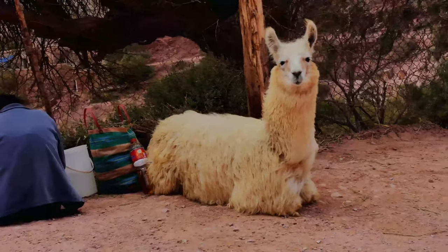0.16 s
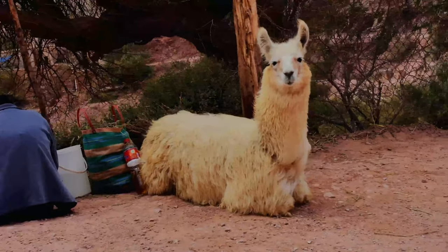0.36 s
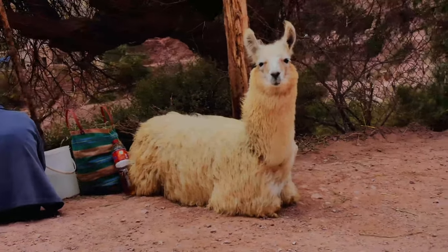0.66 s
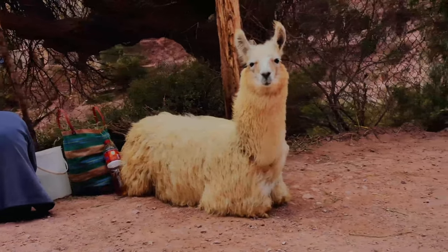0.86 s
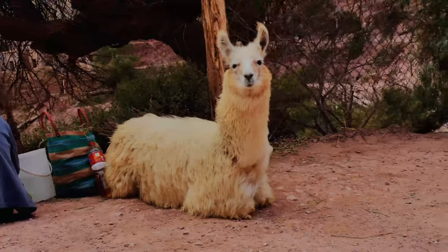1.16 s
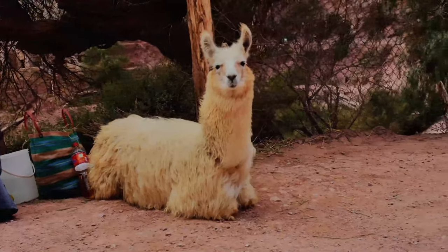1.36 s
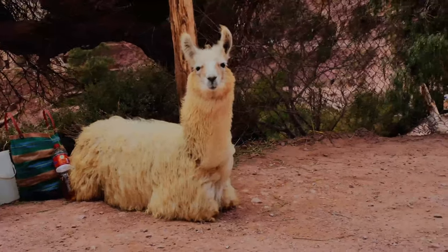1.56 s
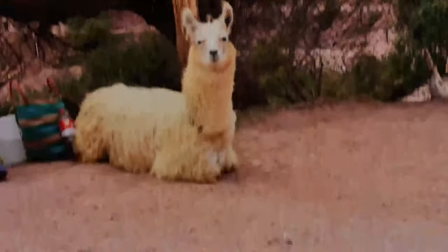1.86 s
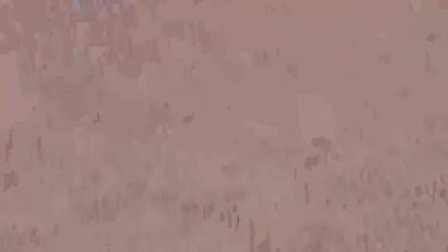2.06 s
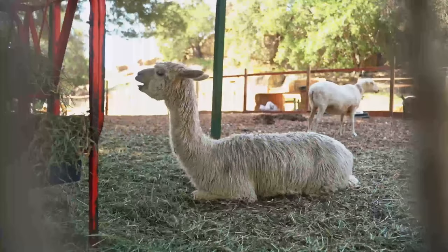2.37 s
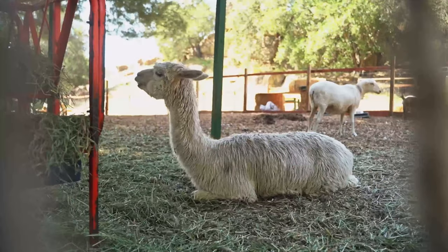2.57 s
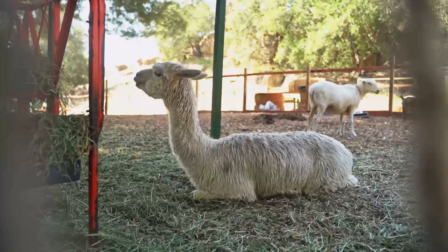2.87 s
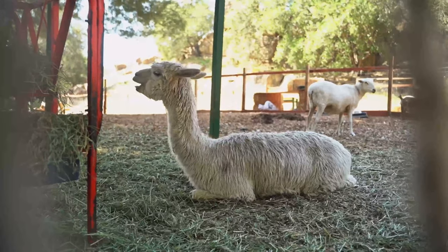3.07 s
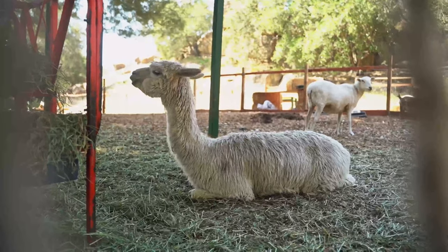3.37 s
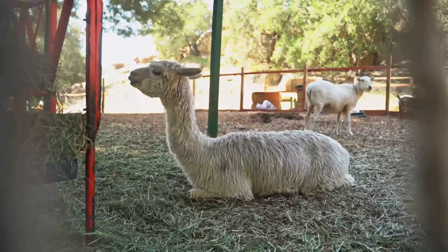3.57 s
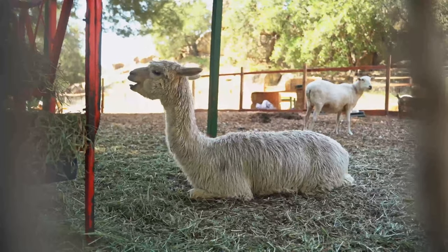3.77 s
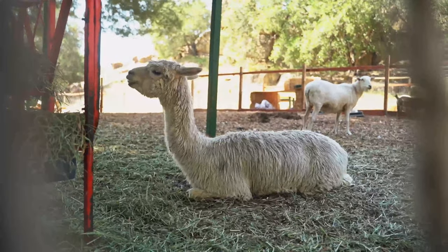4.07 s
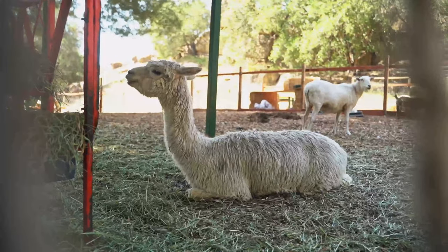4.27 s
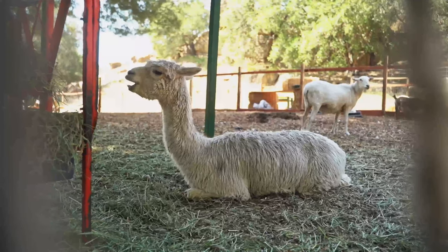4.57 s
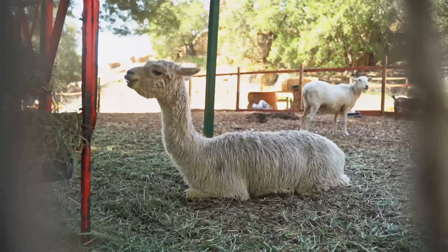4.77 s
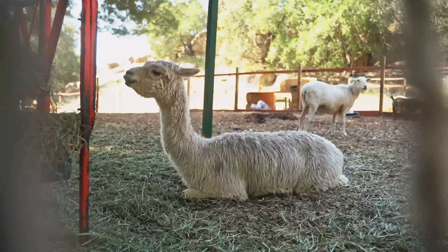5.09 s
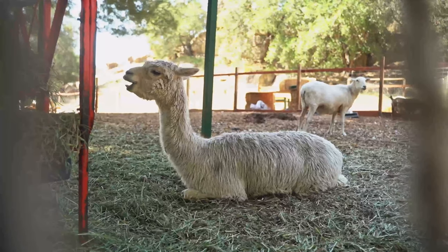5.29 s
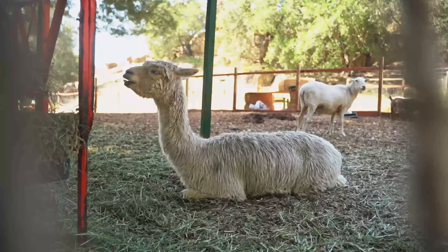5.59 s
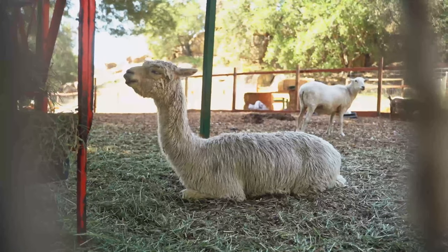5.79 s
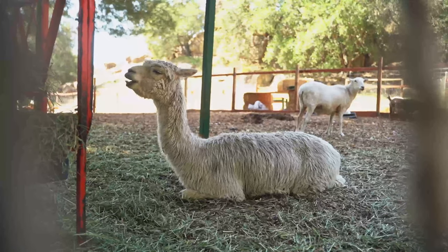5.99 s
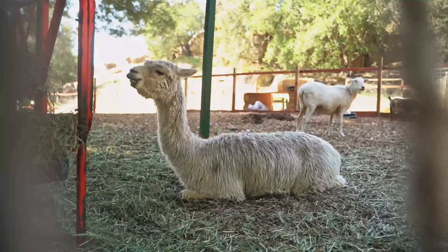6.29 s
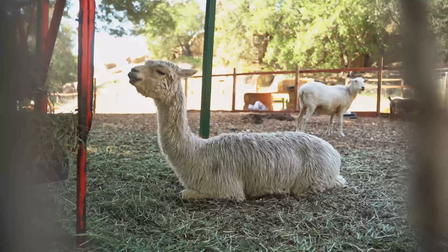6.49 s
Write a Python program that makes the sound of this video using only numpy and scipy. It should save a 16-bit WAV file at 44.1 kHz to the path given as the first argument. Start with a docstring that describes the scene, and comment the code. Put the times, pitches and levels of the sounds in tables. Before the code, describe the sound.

A llama rasps harshly over a low sputtering crackle, then after a cut another groans creakily and later screeches into clucks amid birdsong.

```python
"""A llama rasps harshly: throat resonances ring on noise, kicked and choked by wet flaps of tissue.
Under it sputters a low crackle of clumped noise and pops that swells and stops dead at a cut to a quiet pen.
There a llama gives a creaky groan (slack pulses, thin sine whine), then a throbbing screech (squeal, whistle
and buzz) that breaks into short clucks. Gliding sine notes of small birds run through both scenes, over
soft outdoor noise; the pen also has a low rumble."""
import sys
import numpy as np
from scipy import signal
from scipy.fft import rfft, irfft, next_fast_len
from scipy.io import wavfile
from scipy.ndimage import uniform_filter1d

SR = 44100
rng = np.random.default_rng(int(sys.argv[2]) if len(sys.argv) > 2 else 0)


def unload_audio(sound):
    """Save the sound as a 16-bit wav file, at the path given as the first command line argument."""
    columns = np.transpose(np.atleast_2d(sound))
    # keep every value between -1 and 1, then stretch to whole-number steps
    steps = np.round(np.clip(columns, -1, 1) * 32767)
    wavfile.write(sys.argv[1], SR, steps.astype(np.int16))


N = 292912
T = np.arange(N) / SR  # s

CUT_S = 2.068  # hillside before, pen after
EDGE_HZ = 15750  # top of the whole sound

# Llama calls. Each is one row: start in seconds, end in seconds, starting level in dB before the voice's trim,
# swell in dB per second, attack in seconds, release in seconds. Attack and release each span FADE_DB.
RASP_CALL = (.484, 1.212, -26.3, 6.5, .003, .02)
SCREECH_CALL = (6.013, 6.255, -21, 17, 0.02, 0.02)
GROAN_CALL = (2.33, 3.105, -38.5, 6.5, .27, .17)
FADE_DB = 15.5

# Wet flaps of soft tissue in the rasp. Each entry: time in seconds.
FLAP_TIMES = [.528, .545, .559, .573, .588, 0.604, 0.62, .645, .673, .71, 0.737, .786, 0.843, .87, .915,
              .93, 1.065, 1.134]
# Brief dips in the level of the rasp. Each entry: time in seconds.
CATCH_TIMES = [.537, .662, 1.054]
CATCH_HALF_S, CATCH_DB = 0.0053, -13.5

# Throat resonances at rest. Each row: frequency in Hz, width in Hz, relative level in dB.
RASP_THROAT = [(1429, 55, 6.5), (1840, 350, -3.5), (2714, 235, 2), (3140, 340, -5)]
STRAINED_THROAT = [(480, 55, -10), (1609, 70, -2), (2044, 100, -8.5), (2907, 84, -5.5), (3345, 200, -4),
                   (4593, 120, -1)]
GROAN_THROAT = [(546, 60, -1.5), (1524, 160, -7), (1860, 250, -8), (2290, 160, -6), (2730, 900, -14.5)]

# Spectra of air rushing through the throat. Each row: frequency in Hz, relative level in dB.
RASP_AIR = [(900, -30), (1400, 8), (4300, 3), (5600, -10), (8000, -10.5), (9500, -41)]
SCREECH_AIR = [(800, -10), (1150, -12.5), (3300, -3), (6950, -1), (7600, -40), (9300, -14), (11000, -59)]

# Partials of the squeal from the fundamental up. Each entry: relative level in dB at full push.
SQUEAL_PARTIALS = [-7.5, 4.2, -7]
# the squeal's pitch arches once above rest (lift as a fraction)
SQUEAL_HZ, ARCH_LIFT, ARCH_TOP_S, ARCH_HALF_S = 1527, .093, 6.124, .043
# one hard push in the screech, which ebbs away
PUSH_S, PUSH_DB, PUSH_RISE_S, PUSH_EBB_S = 6.083, 5.5, 0.0043, 0.093
# second whistle of the screech, at rest and at full push
WHISTLE_HZ, WHISTLE_DB = 4950, -1.5

# Clucks. Each row: time in seconds, level in dB, half length in seconds, jaw opening as a pitch factor.
CLUCKS = [(6.27, -21.5, 0.0067, 0.96), (6.312, -30, 0.015, 1.03), (6.415, -28, 0.0087, 0.96),
          (6.454, -30, 0.013, 1.02), (6.509, -26.5, 0.012, .98), (6.623, -24.5, 0.013, 0.9)]

# Loudest single pops of the crackle. Each row: time in seconds, peak in dB before the pop trim.
POPS = [(0.101, -18), (.155, -18.5), (.202, -23), (0.294, -10.5), (0.387, -14), (0.545, -9), (0.649, -7.5),
        (0.711, -6.5), (0.97, -9), (1.009, -4.5), (1.025, -9), (1.26, -10), (1.303, -12), (1.328, -7.5),
        (1.362, -10), (1.371, -9), (1.457, -4), (1.918, -5)]
# Spectrum of the crackle. Each row: frequency in Hz, relative level in dB.
POP_COLOUR = [(40, -37), (140, -6), (280, 1.5), (650, -3.5), (1600, -15), (4500, -35.5), (10500, -49.5),
              (15000, -64)]
# Surges of the crackle. Each row: start in seconds, length in seconds, level in dB.
SURGES = [(0.668, 0.059, -24), (0.828, 0.042, -21.5), (1.217, 0.044, -23), (1.3, 0.038, -22.5),
          (1.435, 0.031, -18), (1.426, 0.14, -20.5), (1.511, .022, -12.5), (1.592, 0.049, -17),
          (1.75, 0.31, -18.5), (1.842, 0.023, -14.5)]
SURGE_RISE_DB_PER_S, SURGE_FALL_DB_PER_S, SIMMER_DB = 1400, 1000, -33.5
# Duller filter on the late crackle. Each row: frequency in Hz, gain in dB.
DULL = [(650, 1.5), (1300, -6)]
DULL_FROM_S = 1.7

# Bird syllables by name. Each row: length in seconds, swell in dB from start to end,
# pitch path in Hz at even steps, before the note's pitch factor.
SYLLABLES = { "tew": (0.0865, 0, [5650, 5350, 5320]), "slur": (.075, -5, [5250, 4950, 4150]),
             "seep": (.17, -20, [7150, 7840, 8050]), "arch": (0.14, 0, [6750, 7300, 7230, 6990, 6400]),
             "dip": (0.06, -5, [7000, 6330, 7100]), "rise": (0.0546, 4.7, [5500, 6110, 6300, 6300]),
             "whistle": (.3, 10.5, [4890, 3720, 3518, 3508, 3448]), "held": (0.23, 0, [3400]),
             "lilt": (0.22, -7, [2500, 2680, 2820]), "warble": (0.06, 0, [3615, 4320, 4040, 3220]),
             "drop": (.034, 0, [4200, 3700, 2950]), "flick": (.042, 3, [4200, 4600, 6050]),
             "zip": (0.041, -8, [5900, 4300, 3800])}
# Single bird notes by syllable. Each row: start in seconds, level in dB before the birds' trim,
# pitch factor if not 1.
NOTES = { "tew": [(.248, -42.5), (2.25, -38.5, 0.94), (2.912, -44.5, 0.96), (4.962, -37.5), (5.418, -37.5),
         (.235, -39, .47), (3.575, -43, .54)], "slur": [(3.285, -37.5), (3.95, -43.5)], "seep": [(.04, -53),
         (2.075, -50.5, 0.94), (4.75, -55.5), (5.21, -58.5)], "dip": [(5.882, -46), (6.343, -49),
         (1.825, -39, 0.578), (1.94, -38, .58)], "rise": [(1.575, -46), (2.449, -40.5)],
         "held": [(2.03, -48, 0.66), (2.8, -38, 1.08), (4.95, -40), (5.14, -45)], "lilt": [(3.932, -44.5)],
         "warble": [(0.037, -44, 1.06), (.152, -43), (2.303, -41.5, .66), (.445, -39, 0.68), (3.84, -38),
         (4.1, -49.5, 1.804)], "drop": [(.21, -40), (4.3, -46, .78), (4.78, -47, .78)]}
# Runs of one syllable. Each row: syllable, start in seconds, end in seconds, period in seconds,
# typical level in dB before the birds' trim, pitch factor.
RUNS = [("flick", .09, .45, .1, -47.5, 0.99), ("dip", 1.168, 2, .156, -53, 1),
        ("arch", 2.565, 3.7, .213, -50.5, 0.99), ("drop", 2.955, 3.9, .0708, -44, .87),
        ("whistle", 3.11, 3.6, .395, -40, 1.02), ("whistle", 3.905, 4.8, .38, -37, 1),
        ("flick", 4.102, 4.7, .0922, -40.5, 0.97), ("flick", 4.747, 7.1, .0935, -46.5, .93),
        ("zip", 5.077, 6.02, .0651, -44, 1)]
# Chatter. Each row: start in seconds, end in seconds, top level in dB before the birds' trim,
# base pitch factor, note count.
CHATTER = [(3.78, 4.62, -42.5, 1.06, 19)]

# Outdoor background spectra. Each row: frequency in Hz, relative level in dB.
HILL_AIR = [(30, 1.5), (110, 6), (1200, -23.5), (3000, -5.5), (8500, -31.5), (15000, -42.5)]
PEN_AIR = [(50, 5), (350, 0), (1900, -14), (3800, -3), (7000, -24.5), (15000, -35)]
HILL_DB, PEN_DB = -41.5, -46
# Low rumble in the pen. Each row: time in seconds, level in dB.
RUMBLE = [(3.1, -48), (5.9, -54), (6.1, -38)]

# Width between the ears. Each row: frequency in Hz, side level against the middle in dB.
SPUTTER_WIDTH = [(280, -13), (700, -5.5), (2400, -6)]
AIR_WIDTH = [(60, -20.5), (380, -11.5), (1300, 1.5)]


def rasp(level_db=-.5, air_db=-14.5, rattle_hz=95, rattle_db=2.3, bend=0.357, flap_s=0.00338,
         snap_db=4, shut_db=-10, shut_s=0.0061, uneven_db=1.5, brighten_db=6.5):
    """Each flap kicks level and resonances up, then chokes the throat; the upper resonances grow late on."""
    kick = sum(bump(s, flap_s) for s in FLAP_TIMES)
    shut = sum(bump(s + shut_s, flap_s) for s in FLAP_TIMES)
    bent = sum(bump(s + flap_s, flap_s) for s in FLAP_TIMES)
    # a quicker, uneven rattle shakes both pitch and level
    rattle = wander(rattle_hz)
    jaw = 1 + bend * bent + 0.035 * rattle
    envelope = effort(RASP_CALL)
    drive = noise() * (envelope > 0)
    low = steady(throat(drive, RASP_THROAT[:2], jaw), size=400)
    high = steady(throat(drive, RASP_THROAT[2:], jaw), size=400)
    brighter = np.clip((T - .9) / 0.18, 0, 1)
    voice = steady(low + high * amp(-4 + brighten_db * brighter))
    # hardly any voice passes below the lowest resonance
    voice = signal.sosfilt(signal.butter(6, 1280, "highpass", fs=SR, output="sos"), voice)
    breath = amp(air_db) * steady(colour(drive, RASP_AIR))
    caught = sum(bump(s, CATCH_HALF_S) for s in CATCH_TIMES)
    gain_db = level_db + uneven_db * wander(34) + rattle_db * rattle
    gain_db = gain_db + snap_db * kick + shut_db * shut + CATCH_DB * caught
    return amp(gain_db) * envelope * (voice + breath)


def screech(level_db=-4, throat_db=-3.5, air_db=-6.5, fold_hz=465, fold_depth=0.33, jitter=0.00683,
            throb_hz=78, throb_depth=0.52, throb_s=6.1095, soften_db=3, beat_db=-8):
    """A squeal modulated by a slower fold, with a whistle and strained buzz; it throbs just after the push."""
    rise = np.clip(1 + (T - PUSH_S) / PUSH_RISE_S, 0, 1)
    push = rise * np.exp(-(np.maximum(T - PUSH_S, 0) / PUSH_EBB_S) ** 2)
    gain = effort(SCREECH_CALL) * amp(PUSH_DB * push)
    pitch = SQUEAL_HZ * (1 + ARCH_LIFT * bump(ARCH_TOP_S, ARCH_HALF_S))
    below_top = pitch / pitch.max()
    high = glide(pitch * (1 + jitter * wander(254)))
    # the slow fold reaches fold_hz at the top of the arch
    low = glide(fold_hz * (1 + 0.0254 * wander(194)) * below_top)
    # higher partials soften as the push ebbs
    partials = sum(amp(db + k * soften_db * (push - 1)) * np.cos((k + 1) * high)
                   for k, db in enumerate(SQUEAL_PARTIALS))
    fold = np.cos(low) + np.cos(2 * low) / 2
    squeal = unit(amp(beat_db) * np.cos(high + low) + partials * (1 + fold_depth * fold))
    jaw = np.sqrt(pitch / pitch.mean())
    strain = steady(throat(noise() * (gain > 0), STRAINED_THROAT, jaw), size=400)
    # the whistle dips while the squeal arches
    whistle_hz = WHISTLE_HZ * (SQUEAL_HZ / pitch) ** .72
    whistle = np.sin(glide(whistle_hz * (1 + jitter * wander(210))))
    tones = squeal + amp(WHISTLE_DB) * whistle * (1 + push) / 2
    rush = unit(colour(buzz(below_top), SCREECH_AIR))
    throb = 1 + throb_depth * bump(throb_s, 0.021) * np.cos(2 * np.pi * throb_hz * (T - throb_s))
    return amp(level_db) * gain * throb * (tones + amp(throat_db) * strain + amp(air_db) * rush)


def clucks(air_db=-5):
    """Short pushes of strained buzz and breath through the same throat, each with its own jaw setting."""
    gain = sum(amp(db) * bump(s, half) for s, db, half, _ in CLUCKS)
    nearest = np.argmin([abs(T - row[0]) for row in CLUCKS], axis=0)
    jaw = uniform_filter1d(np.array(CLUCKS)[nearest, 3], size=600)
    drive = buzz(jaw)
    calling = T > SCREECH_CALL[1]
    voice = steady(throat((drive + noise()) * calling, STRAINED_THROAT, jaw), size=400)
    return gain * calling * (voice + amp(air_db) * unit(colour(drive, SCREECH_AIR)))


def buzz(jaw, fold_hz=424, breath_db=-5, jitter=.011):
    """Wavering pulses of the strained folds, with some air; the jaw factor scales their rate."""
    turns = np.cumsum(fold_hz * jaw * (1 + jitter * wander(120))) // SR
    pulses = np.diff(turns, prepend=0)
    return unit(unit(pulses - pulses.mean()) + amp(breath_db) * noise())


def groan(level_db=-1.5, creak_hz=125, breath=0.041, rise_per_s=0.3, open_s=2.747,
          brighten_db_per_s=10, whine_hz=3930, warble=0.0484):
    """Slow, uneven pulses of a slack voice that brightens as the mouth opens, under a thin rising whine."""
    phase = cycles(creak_hz, jitter=.35)
    pulses = (np.diff(phase, prepend=0) < 0) * amp(3.6 * wander(80))
    envelope = effort(GROAN_CALL)
    drive = (pulses + breath * noise() * np.exp(-phase)) * (envelope > 0)
    low = throat(drive, GROAN_THROAT[:1], np.ones(N), drift=.035)
    high = throat(drive, GROAN_THROAT[1:], np.ones(N), drift=.035)
    since = np.clip(T - open_s, -.4, .2)
    flutter = np.cos(2 * np.pi * cycles(125, jitter=.25))
    whine_path = whine_hz * (1 + rise_per_s * since) * (1 + warble * (flutter + wander(850) / 2))
    whine = np.sin(glide(whine_path)) * (1 + flutter / 2) * bump(open_s, 0.32)
    return amp(level_db) * envelope * (low + high * amp(brighten_db_per_s * since) + whine)


def effort(call):
    """Gain of a call: attack, a slowly swelling hold and release; silent outside its span."""
    start, end, db, swell, attack, release = call
    t = np.clip(T, start, end)
    faded = np.maximum(1 - np.minimum((t - start) / attack, (end - t) / release), 0)
    edges = np.clip(np.minimum(t - start, end - t) / 0.0057, 0, 1)
    return amp(db + swell * (t - start) - FADE_DB * faded) * edges


def throat(drive, modes, jaw, drift=0.014, reach_hz=1400):
    """Steep resonances that slide with the jaw (less so above reach_hz), each also drifting on its own."""
    out = np.zeros(N)
    live = np.flatnonzero(drive)
    span = slice(live[0], live[-1])
    for hz, width, db in modes:
        path = hz * jaw[span] ** min(reach_hz / hz, 1) * (1 + drift * wander(23)[span])
        # shift the resonance down to 0 Hz, smooth twice, shift back
        turn = np.exp(1j * glide(path))
        r = np.exp(-np.pi * width / SR)
        ringing = signal.lfilter([(1 - r) ** 2], [1, -2 * r, r * r], drive[span] / turn)
        out[span] += amp(db) * (turn * ringing).real
    return steady(out * SR)


def cycles(rate_hz, jitter):
    """Position 0-1 within each uneven cycle of a wavering rate."""
    return np.cumsum(rate_hz * np.exp(jitter * wander(rate_hz))) / SR % 1


def sputter(clump_db=4.5, pop_db=-1, pop_s=0.0013, grit_per_s=110, grit_db=-12):
    """A low crackle: clumps of small pops, with fine grit and single loud pops on top."""
    clumps, gain = amp(clump_db * wander(166)), surging()
    t, layers = T[:SR // 20], []
    for _ in range(2):
        crackle = gain * steady(colour(noise() * clumps, POP_COLOUR), size=1800)
        crackle += amp(grit_db) * gain * noise() * (rng.random(N) < grit_per_s / SR)
        for s, db in POPS:
            # start the pop mid-window so the filter can ring both ways
            envelope = np.roll(t * np.exp(-t / pop_s), len(t) // 2)
            pop = colour(rng.standard_normal(len(t)) * envelope, POP_COLOUR)
            add(crackle, s - t[-1] / 2, amp(db + pop_db) * pop / abs(pop).max())
        layers.append(np.where(T < DULL_FROM_S, crackle, colour(crackle, DULL)))
    # the biggest bursts are rounded off
    return .8 * np.tanh(wide(*layers, SPUTTER_WIDTH) / .8)


def surging():
    """Gain of the crackle: a steady simmer with surges added in power."""
    power = amp(SIMMER_DB) ** 2
    for start, length, db in SURGES:
        before_db = (start - T) * SURGE_RISE_DB_PER_S
        after_db = (T - start - length) * SURGE_FALL_DB_PER_S
        power = power + amp(db - np.clip(np.maximum(before_db, after_db), 0, 100)) ** 2
    return np.sqrt(power)


def birds(level_db=3, uneven_db=2.5):
    """Single notes, runs of repeated notes and the chatter of farther birds."""
    out = np.zeros(N)
    for name, notes in NOTES.items():
        for s, *note in notes:
            add(out, s, chirp(name, *note))
    for name, first, until, period, db, pitch in RUNS:
        for s in np.arange(first, until, period):
            add(out, s, chirp(name, db + uneven_db * rng.standard_normal(), pitch))
    for start, end, db, pitch, count in CHATTER:
        for k, (late, kind, size, high) in enumerate(rng.random((round(count), 4))):
            name = ["warble", "drop"][int(kind * 2)]
            s = start + (end - start) * (k + late) / count
            add(out, s, chirp(name, db - 6 * size, pitch * (.92 + .12 * high)))
    return amp(level_db) * out


def chirp(name, db, pitch=1, waver=0.0027, flutter_db=3.5):
    """One near-pure bird note gliding along its smooth pitch path."""
    length, swell_db, path = SYLLABLES[name]
    u = np.linspace(0, 1, int(length * SR))
    hz = np.polyval(np.polyfit(np.linspace(0, 1, len(path)), path, len(path) - 1), u)
    # fresh random values every 5 ms for pitch and level
    shake, flutter = (np.interp(u * length, np.arange(200) / 200, row)
                      for row in rng.standard_normal((2, 200)))
    tone = np.sin(glide(hz * pitch * (1 + waver * shake)))
    tone = tone * amp(swell_db * u + flutter_db * flutter)
    return amp(db) * unit(tone * signal.windows.tukey(len(u), .35))


def air(points):
    """A gently drifting noise background, nearly common to both ears in the bass."""
    mid, other = (unit(colour(noise(), points)) for _ in range(2))
    return wide(mid, other, AIR_WIDTH) * amp(1.05 * wander(2.9))


def outdoors(x, wet_db, t60, lag_ms=0):
    """Direct sound, later in the left ear by the lag, plus scattered echoes from ground, fence and trees."""
    t, size = T[:SR], next_fast_len(N)
    sparse = rng.standard_normal((2, SR)) * (rng.random((2, SR)) < .05)
    taps = sparse * amp(-60 * t / t60)
    taps /= np.linalg.norm(taps, axis=1, keepdims=True)
    # in the treble the phase between the ears levels off
    phase = np.clip(2 * np.pi * np.fft.rfftfreq(size, 1000 / SR) * lag_ms, -1.8, 1.8)
    left = irfft(rfft(x, size) * np.exp(-1j * phase), size)[:N]
    echoes = signal.fftconvolve(x[None], taps, axes=1)[:, :N]
    return np.array([left, x]) + amp(wet_db) * echoes


def wide(mid, other, width):
    """Two ears: a common sound plus a share of a like one with opposite sign in each ear."""
    return mid + colour(other, width) * np.array([[1], [-1]])


def amp(db):
    """Decibels to gain."""
    return 10 ** (np.asarray(db) / 20)


def unit(x):
    """Scales to rms 1."""
    return x / np.sqrt(np.mean(x ** 2) + 1e-20)


def steady(x, size=1500):
    """Holds the rms near 1 over a window of samples while leaving faster flutter alone."""
    return x / np.sqrt(abs(uniform_filter1d(x ** 2, size)) + 1e-9)


def curve(rows):
    """Joins (s, value) points into a control."""
    return np.interp(T, *np.transpose(rows))


def bump(s, half_s):
    """A bell of height 1 around time s; half_s is its standard deviation."""
    out = np.zeros(N)
    near = slice(*np.searchsorted(T, [s - 6 * half_s, s + 6 * half_s]))
    out[near] = np.exp(-.5 * ((T[near] - s) / half_s) ** 2)
    return out


def glide(hz):
    """Running phase in radians of a moving pitch."""
    return 2 * np.pi * np.cumsum(hz) / SR


def noise():
    """White noise."""
    return rng.standard_normal(N)


def wander(rate_hz):
    """Smooth random control of rms 1, with a bell-shaped spectrum about rate_hz wide."""
    size = next_fast_len(N)
    hz = np.arange(0, min(4 * rate_hz, SR / 2), SR / size)
    bins = rng.standard_normal((len(hz), 2)) @ [1, 1j]
    return unit(irfft(bins * np.exp(-(hz / rate_hz) ** 2), size)[:N])


def colour(x, points):
    """Filters by a spectrum of (Hz, dB) points joined on a log frequency axis."""
    hz, db = np.transpose(points)
    size = next_fast_len(len(x))
    log_hz = np.log(np.fft.rfftfreq(size, 1 / SR) + 1)
    return irfft(rfft(x, size) * amp(np.interp(log_hz, np.log(hz), db)), size)[:len(x)]


def add(mix, s, sound):
    """Mixes a sound in at time s."""
    part = mix[max(round(s * SR), 0):][:len(sound)]
    part += sound[:len(part)]


def scene():
    """The hillside, then the pen, with birds over both."""
    hill = outdoors(rasp(), wet_db=-13.0, t60=0.38) + sputter()
    hill += amp(HILL_DB) * air(HILL_AIR)
    pen = outdoors(screech() + clucks(), wet_db=-8, t60=0.22)
    pen += outdoors(groan(), wet_db=-8.5, t60=0.16, lag_ms=-0.061)
    pen += amp(PEN_DB) * air(PEN_AIR)
    pen += amp(curve(RUMBLE)) * air([(45, -4.0), (300, -32.5), (900, -75)])
    song = outdoors(birds(), wet_db=-6, t60=.55, lag_ms=.15)
    return np.where(T < CUT_S, hill, pen) + song


def record(dry):
    """Band limit: a steep low-pass at EDGE_HZ."""
    lowpass = signal.firwin(511, EDGE_HZ, window=("kaiser", 9), fs=SR)
    return signal.oaconvolve(dry, lowpass[None], "same")


dry = scene()
out = record(dry)
unload_audio(out)
```